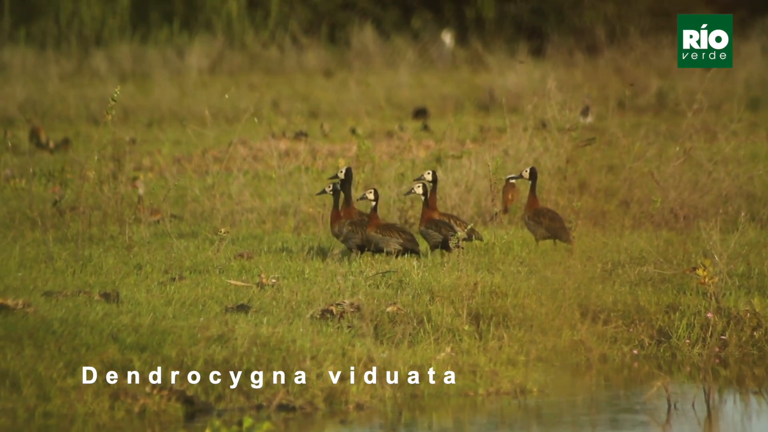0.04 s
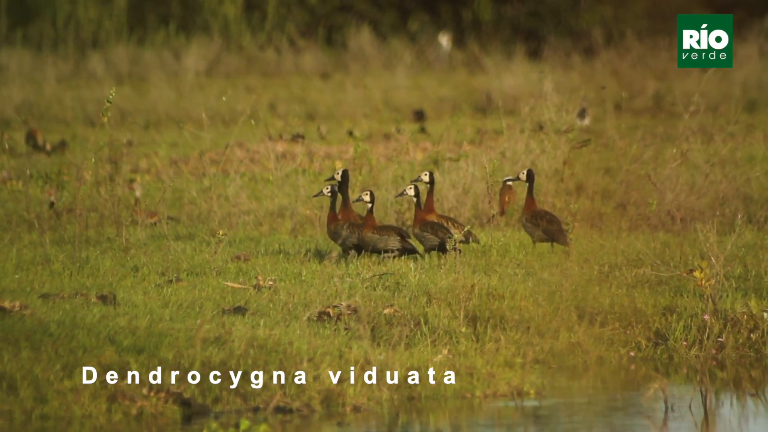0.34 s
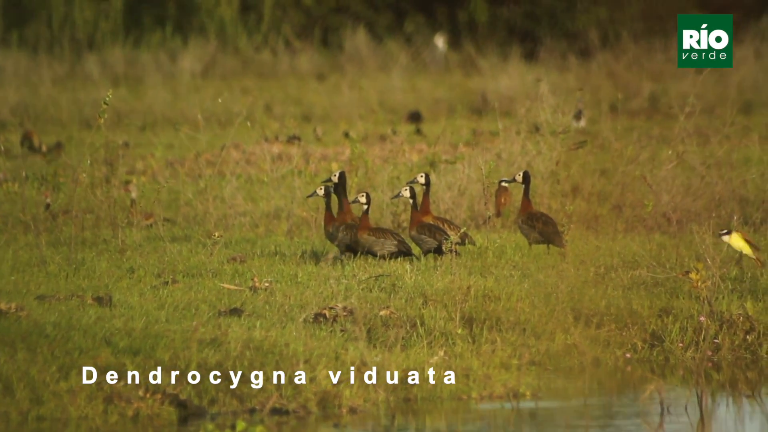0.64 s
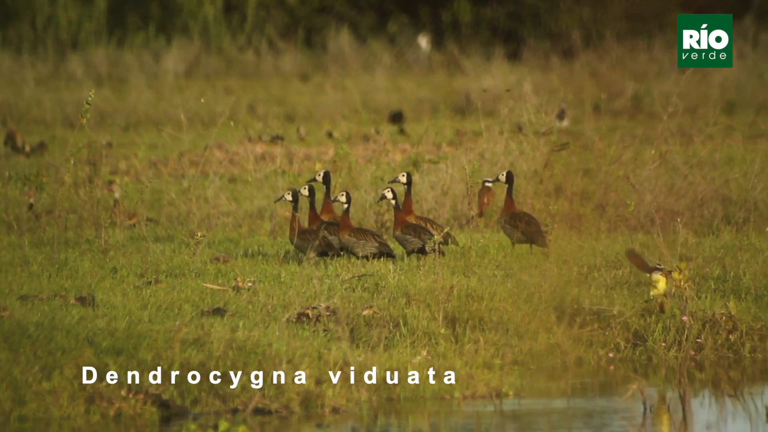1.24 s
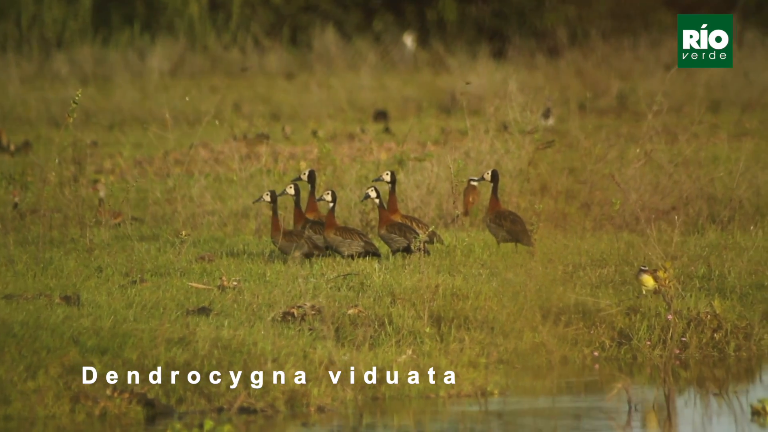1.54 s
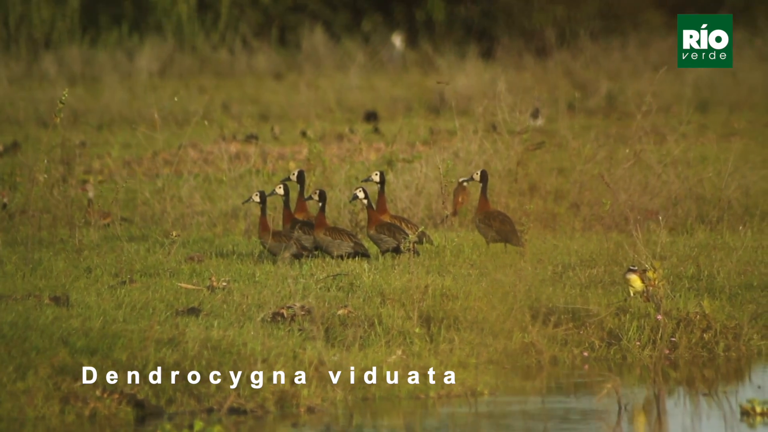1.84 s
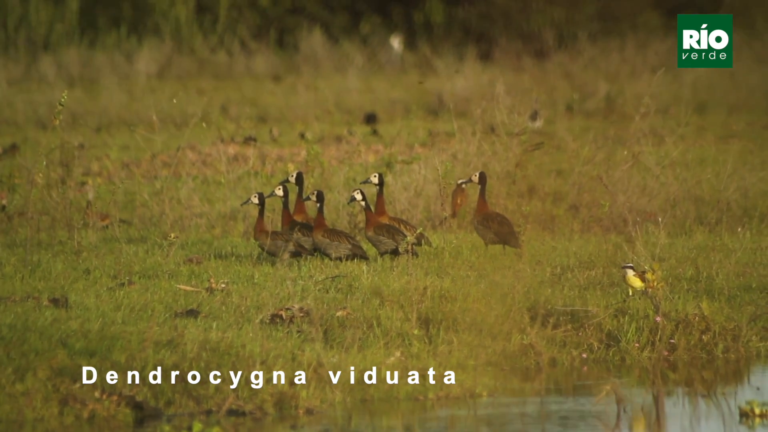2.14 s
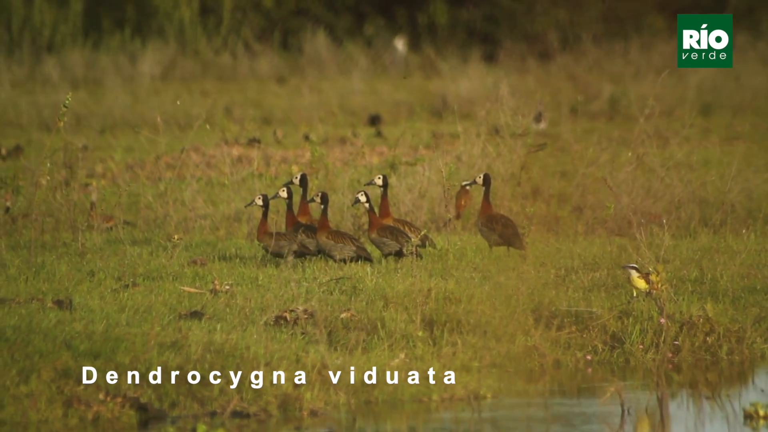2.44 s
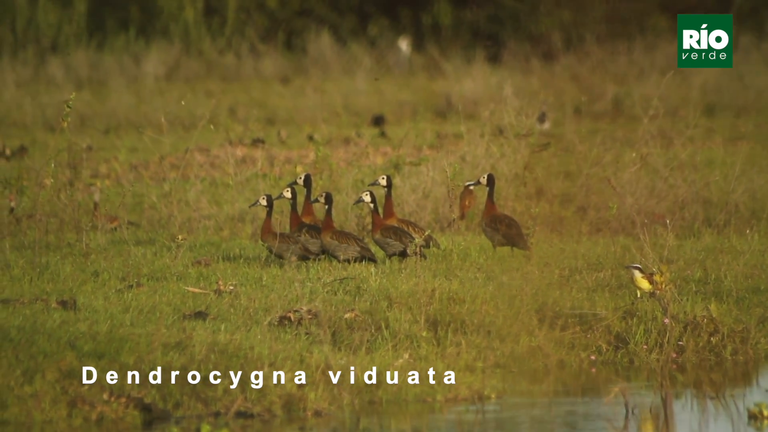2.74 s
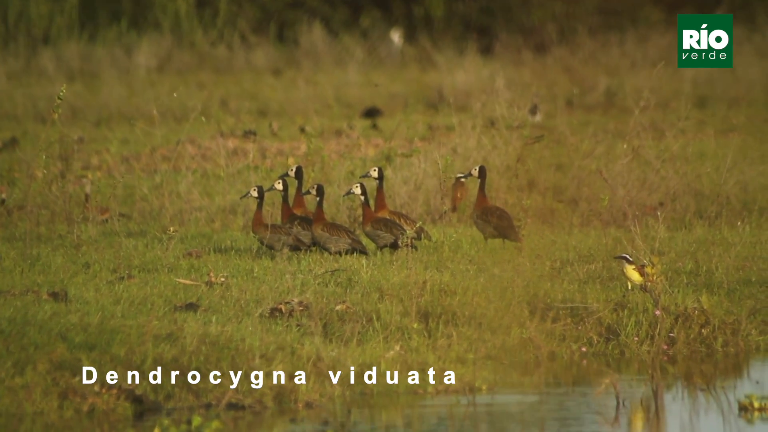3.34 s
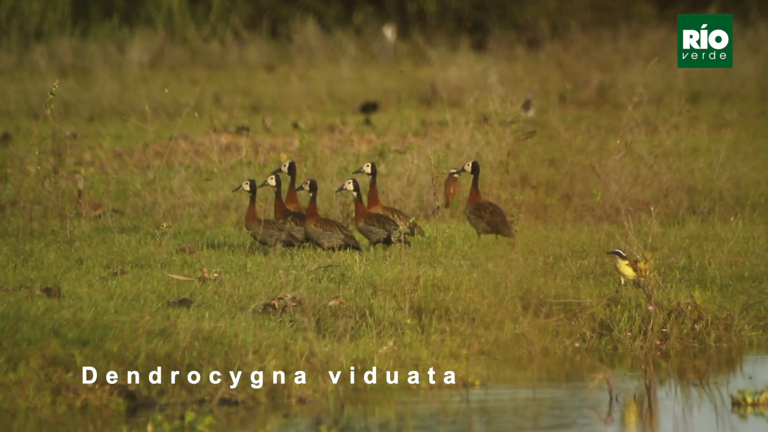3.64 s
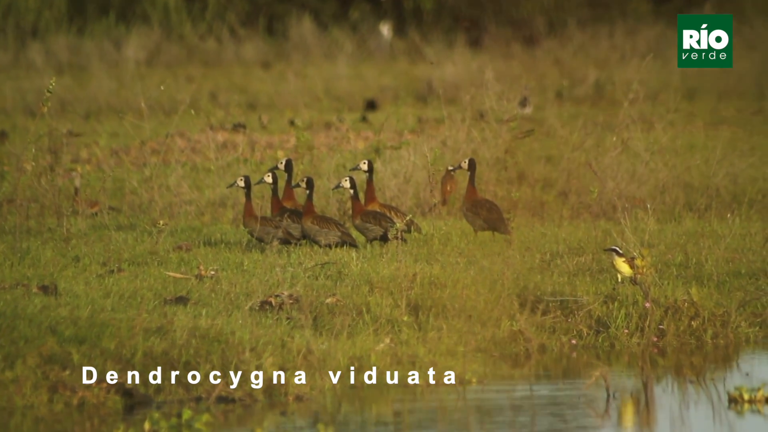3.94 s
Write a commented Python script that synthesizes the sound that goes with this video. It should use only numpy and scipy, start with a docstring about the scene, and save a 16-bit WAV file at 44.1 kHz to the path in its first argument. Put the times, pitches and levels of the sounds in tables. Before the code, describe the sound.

Bush crickets buzz steadily while a duck whistles and other birds cackle and twitter.

```python
"""A brief low thump sounds over bush crickets that buzz steadily, scraping their wings.
In this marsh meadow birds tick, hoot softly and cackle; a whistling duck gives three slurred notes,
harmonics filtered by its throat. Later another bird whistles twice, and chips and twittering follow
over distant chatter. Reeds and trees scatter the bird calls into a short, diffuse echo.
Now and then a puff of wind bumps the microphone."""
import sys
import numpy as np
from scipy import signal
from scipy.fft import rfft, irfft
from scipy.io import wavfile
from scipy.ndimage import uniform_filter1d

SR = 44100
rng = np.random.default_rng(int(sys.argv[2]) if len(sys.argv) > 2 else 0)


def digitize_waveform(pressure):
    """Quantize a signal to 16-bit integers and store it at the path in sys.argv[1].

    Rows of a 2-D input are taken as channels; values are limited to [-1, 1].
    """
    field = np.atleast_2d(pressure).T
    bounded = np.clip(field, -1, 1)
    quanta = np.round(bounded * 32767).astype(np.int16)
    wavfile.write(sys.argv[1], SR, quanta)


N = 176400

def undb(db):
    """Amplitude ratio of a level in decibels."""
    return 10 ** (np.asarray(db) / 20)

def unit(x):
    """Normalisation to rms 1."""
    return x / np.sqrt(np.mean(np.abs(x) ** 2))

def curve(t, rows, col=1):
    """Linear interpolation of one column of a table."""
    rows = np.array(rows)
    return np.interp(t, rows[:, 0], rows[:, col])

def colour(hz, points):
    """Frequency response, interpolated on logarithmic axes."""
    p = np.array(points)
    return undb(np.interp(np.log(hz + 1), np.log(p[:, 0]), p[:, 1]))

def noise(points):
    """White noise filtered to a given spectrum."""
    return unit(irfft(rfft(rng.standard_normal(N)) * colour(np.fft.rfftfreq(N, 1 / SR), points), N))

def wander(hz):
    """Random fluctuation: low-pass noise of bandwidth about hz."""
    lowpass = np.exp(-.5 * (np.fft.rfftfreq(N, 1 / SR) / hz) ** 2)
    return unit(irfft(rfft(rng.standard_normal(N)) * lowpass, N))

def hiss(t, hz, width_hz):
    """Narrow-band noise: a carrier multiplied by a random fluctuation."""
    return unit(wander(width_hz) * np.sin(2 * np.pi * hz * t))

def phase(hz):
    """Phase as the integral of frequency."""
    return 2 * np.pi * np.cumsum(hz) / SR

def add(out, start, x):
    """Superposition of a sound at its start time."""
    i = max(int(start * SR), 0)
    out[i:i + len(x)] += x[:max(len(out) - i, 0)]

def span(length):
    """Normalised time, 0 to 1 over a note."""
    return np.linspace(0, 1, max(int(length * SR), 8))

def during(x, start, u):
    """The stretch of a modulating signal that a note covers."""
    return np.roll(x, -int(start * SR))[:len(u)]

def gate(t, start, end, edge_s=.0051):
    """Trapezoidal envelope."""
    return np.clip(np.minimum(t - start, end - t) / edge_s + .5, 0, 1)

def arch(u):
    """Half-sine envelope."""
    return np.abs(np.sin(np.pi * u))

def thump_and_wind(t, breeze_db=-49):
    """Amplitude-modulated rumble: a brief low thump at the start, then wind pressure on the microphone."""
    # swells of rumble, the opening thump first and wind after it: centre t/s, half width/s, level/dB
    swells = [(.01,0.013,-25.5),(.2,.15,-44.5),(1.22,0.064,-35),(1.48,0.13,-37.5),(1.812,0.042,-36.5),(2.072,0.016,-29.5),(2.24,0.12,-38.5),(2.9,0.14,-38.5),(3.41,0.051,-38.5),(3.968,0.015,-31)]
    # rumble spectrum: f/Hz, gain/dB
    spectrum = [(20,-18.5),(65,3.5),(115,1),(190,-7),(400,-26.5),(800,-45.5)]
    # pressure pulses: t/s, width/s, peak level/dB
    puffs = [(1.771,.002,-22.5),(2.207,0.0022,-20),(3.207,.0014,-22.5),(3.78,.0014,-16.5)]
    rumble = noise(spectrum)
    power = sum(undb(db) ** 2 * np.exp(-((t - when) / width) ** 2) for when, width, db in swells)
    power += undb(breeze_db) ** 2
    out = rumble * np.sqrt(power / uniform_filter1d(rumble ** 2, size=3000))
    for when, width, db in puffs:
        u = (t - when) / width
        out -= undb(db) * (1 - u ** 2) * np.exp(-u ** 2 / 2)
    return out

def stridulate(rate, hz, sweep_hz, rasp, duty=.6, jitter_hz=111.17):
    """Stridulation: each wing stroke scrapes out a raspy, gliding tone."""
    cycle = (phase(rate * (1 + .0066 * wander(2.2))) / (2 * np.pi) + rng.random()) % 1
    u = np.minimum(cycle / duty, 1)
    teeth = 1 + rasp * (wander(480) + 1j * wander(480))
    pitch = hz + sweep_hz * (u - .5) + jitter_hz * wander(122.6)
    return unit(arch(u) * (teeth * np.exp(1j * phase(pitch))).real)

def bush_crickets(level_db=-25):
    """Three near insects stridulate over a chorus whose incoherent sum is noise."""
    # near singers: stroke rate/Hz, f/Hz, sweep per stroke/Hz, relative level/dB
    buzzers = [(50.1,9750,-900,-40.5),(64,10350,901,-40.5),(50.34,10080,-200,-34)]
    # chorus spectrum: f/Hz, gain/dB
    chorus = [(7000,-46.5),(8600,-34.5),(9000,-11.5),(9500,-1),(9850,-5.5),(10060,2),(10270,-16),(10370,-6.5),(10500,0),(10630,-3.5),(10960,-14.5),(11300,-13),(11550,-29.5),(15000,-41.5)]
    near = sum(undb(db) * stridulate(rate, hz, sweep, rasp=1.9) for rate, hz, sweep, db in buzzers)
    return undb(level_db) * unit(near + undb(-31) * noise(chorus))

def still_air(level_db=-51):
    """Stationary broadband noise forms the ambient floor."""
    # ambient spectrum: f/Hz, gain/dB
    spectrum = [(100,-1.5),(450,-2.5),(530,4.5),(620,-2),(2200,-5),(12000,-6.5),(15700,-17)]
    return undb(level_db) * noise(spectrum)

def ticks(length_s=.014, hz=3690, gap_s=.0388):
    """A bird's pulse train of falling chirps, quickening to a steady beat."""
    out, u = np.zeros(N), span(length_s)
    tick = undb(-46) * arch(u) ** 2 * np.sin(phase(hz * (1 + .17 * (1 - 2 * u))))
    for k in range(18):
        middle = .075 + k * gap_s + .038 * (1 - np.exp(-k / 2.6))
        fade_in = 1 - np.exp(-middle / .064)
        add(out, middle - length_s / 2, fade_in * tick)
    return np.sqrt(2) * out

def burst_cricket(t, hz=8360):
    """Gated stridulation of a lower-pitched bush cricket, blurred by noise."""
    # bursts: start t/s, end t/s
    bursts = [(.11,.3),(.43,.61),(.72,.95),(1.06,1.29),(1.37,1.6),(1.71,1.94),(2.2,2.45),(2.57,2.98),(3.06,3.45),(3.52,4.0)]
    song = stridulate(97.5, hz, sweep_hz=-700, rasp=.34) + .5 * hiss(t, hz, width_hz=380)
    return undb(-49.5) * song * sum(gate(t, start, end, edge_s=.018) for start, end in bursts)

def hoots():
    """Frequency glide of a soft, low pure tone that rises quickly and sinks away."""
    # hoots: t/s, length/s, top f/Hz, base level/dB
    notes = [(0.226,0.27,867,-48),(0.784,0.25,881,-46.5),(2.337,0.27,865,-46.5),(2.889,0.26,878,-44)]
    # hoot contour: share of length, frequency ratio, gain/dB
    shape = [(0,0.82,-13.5),(.09,0.95,4),(.2,1,6.5),(.35,0.99,6),(.55,.935,2),(.75,0.8,-14),(1,0.72,-15)]
    out = np.zeros(N)
    for start, length, hz, db in notes:
        u = span(length)
        add(out, start, undb(db + curve(u, shape, 2)) * np.sin(phase(hz * curve(u, shape))))
    return np.sqrt(2) * out

def cackle(u, pitch_hz, sag, jitter, bill_hz, bill_q=1.23):
    """Source and filter: an arched, sagging harmonic tone passes throat and bill resonances."""
    # throat response: f/Hz, gain/dB
    throat = [(700,-10),(1450,2),(2000,-10.5),(2700,-4.5),(3500,-9.5),(4300,-7),(5000,-2.5),(5700,-12),(7000,-40)]
    k = np.arange(1, 12)[:, None]
    hz = pitch_hz * (1 - .17 * (2 * u - 1) ** 2 - sag * (2 * u - 1)) * (1 + .12 * jitter)
    harmonics = np.sin(k * phase(hz) + rng.uniform(0, 2 * np.pi, k.shape))
    bill = 1 / np.hypot(1, bill_q * (k * hz / bill_hz - bill_hz / (k * hz)))
    return arch(u) * unit((bill * colour(k * hz, throat) * harmonics).sum(0))

def near_cackles():
    """Nasal notes, some made harsh by frequency jitter."""
    # cackles: t/s, length/s, top f/Hz, level/dB, roughness 0-1, bill resonance f/Hz
    notes = [(0.328,.068,720,-45,0.04,3500),(1.247,0.053,739,-38.5,0.48,4560),(1.367,0.085,814,-41.5,0,4770),(1.536,0.052,876,-42,0.13,4500),(2.164,0.045,695,-44,0.17,4730),(2.285,0.071,1020,-47,0.18,3500),(2.616,0.02,865,-41,.12,3700)]
    out, jitter = np.zeros(N), wander(480)
    for start, length, hz, db, rough, bill_hz in notes:
        u = span(length)
        note = cackle(u, hz, sag=.0417, jitter=rough * during(jitter, start, u), bill_hz=bill_hz)
        add(out, start, undb(db) * note)
    return out

def slurs():
    """Short bird notes whose frequency follows a parabola through three pitches."""
    # notes: t/s, length/s, start f/Hz, middle f/Hz, end f/Hz, level/dB
    notes = [(.624,0.046,710,873,750,-39.5),(2.731,0.047,714,876,720,-38),(1.973,0.087,4300,5080,6100,-40.5),(2.2,.072,2100,2760,2770,-43)]
    out, shake = np.zeros(N), 1 + .028 * wander(400)
    for start, length, *pitches, db in notes:
        u = span(length)
        hz = np.polyval(np.polyfit([0, .5, 1], pitches, 2), u) * during(shake, start, u)
        add(out, start, undb(db) * arch(u) * np.sin(phase(hz)))
    return np.sqrt(2) * out

def duck(t, slur_s=.0059, tilt_db=-2):
    """Source and filter: four harmonics of a whistle glide through the throat resonance."""
    # three-note call: t/s, f/Hz, source level/dB
    call = [(.76,2270,-58),(.8,2410,-39.5),(.825,2710,-31.5),(.86,3300,-33.5),(.89,3530,-31.5),(.908,3980,-32.5),(.937,4080,-33),(.961,2620,-34.5),(.987,1950,-45.5),(1.01,2750,-31.5),(1.03,3385,-31.5),(1.056,3300,-32.5),(1.073,3557,-31),(1.1,3684,-39),(1.122,2455,-47),(1.14,2130,-37.5),(1.175,2853,-32),(1.21,2933,-35),(1.285,2610,-34),(1.365,2434,-35.5),(1.425,2165,-42)]
    # throat response: f/Hz, gain/dB
    throat = [(2000,-37),(2500,-12.5),(3000,-3),(3600,-1),(4200,1),(5200,0.5),(5900,-22.5),(8800,-10.5),(13000,-38)]
    smoothing = signal.windows.hann(int(2 * slur_s * SR)) / (slur_s * SR)
    hz = np.convolve(curve(t, call), smoothing, "same") * (1 + .0028 * wander(135))
    voice = sum(undb(tilt_db * (k - 1)) * colour(k * hz, throat) * np.sin(k * phase(hz))
                for k in range(1, 5))
    return np.sqrt(2) * voice * undb(curve(t, call, 2)) * gate(t, call[0][0], call[-1][0])

def insect_trills(t, rate_hz=50):
    """Amplitude modulation breaks a wavering tone into two faint trills."""
    # trills: start t/s, end t/s, f/Hz, level/dB
    trills = [(1.424,1.713,6130,-55),(2.55,2.996,6210,-58)]
    out = np.zeros(N)
    for start, end, hz, db in trills:
        beat = .4 + arch(phase(rate_hz * (1 + .072 * wander(8))) / (2 * np.pi)) ** 2
        tone = np.sin(phase(hz * (1 + .012 * wander(194))))
        out += undb(db + 2 * wander(30)) * gate(t, start, end, edge_s=.035) * unit(beat * tone)
    return out

def chatter(length_s=.085, pitch_hz=932):
    """Superposition of distant cackles, scattered in onset, pitch and length."""
    # bouts: start t/s, end t/s, note rate/Hz, level/dB
    bouts = [(1.751,3.3,8,-52),(3.297,4.0,24,-52.5)]
    out, jitter = np.zeros(N), .12 * wander(500)
    for start, end, rate, db in bouts:
        for when in np.arange(start, end, 1 / rate):
            late, detune, stretch = rng.uniform(-1, 1, 3)
            u = span(length_s * (1 + stretch / 3))
            hz = pitch_hz * (1 + .13 * detune)
            note = cackle(u, hz, sag=.0902, jitter=during(jitter, when, u), bill_hz=3100)
            add(out, when + late / rate / 2, undb(db) * note)
    return out

def insect_hiss(t):
    """Two narrow noise bands: one swells, a thinner one joins in and holds steady."""
    # swell: t/s, level/dB
    swell = [(0,-73),(2,-68),(2.3,-57),(3.1,-50),(3.6,-49),(4,-49)]
    thin = undb(-59) * hiss(t, 7670, width_hz=110) * gate(t, 2.13, np.inf, edge_s=.044)
    return undb(curve(t, swell)) * hiss(t, 8280, width_hz=300) + thin

def rasps(t):
    """Band noise under Gaussian envelopes gives two hoarse bird calls."""
    # rasps: centre t/s, half width/s, level/dB
    calls = [(2.944,0.025,-41.5),(3.015,0.034,-48.5)]
    envelope = sum(undb(db) * np.exp(-((t - when) / width) ** 2) for when, width, db in calls)
    return envelope * hiss(t, 4420, width_hz=480)

def answer(t):
    """Another bird whistles twice, each note a single gliding sinusoid."""
    # one contour a note: t/s, f/Hz, level/dB
    notes = [
        [(3.058,3740,-45),(3.072,4660,-33.5),(3.101,4743,-28.5),(3.112,5700,-42)],
        [(3.172,3770,-43),(3.188,4610,-30),(3.22,4710,-30),(3.27,4606,-34.5),(3.315,4530,-40),(3.34,4190,-44)],
    ]
    out = np.zeros(N)
    for note in notes:
        hz = curve(t, note) * (1 + .0028 * wander(150))
        out += undb(curve(t, note, 2)) * np.sin(phase(hz)) * gate(t, note[0][0], note[-1][0])
    return np.sqrt(2) * out

def chips(length_s=.0088, centre_hz=5280):
    """Steep downward chirps, roughened by random frequency modulation."""
    # chips: t/s, level/dB
    notes = [(3.148,-32),(3.222,-33),(3.304,-33)]
    out, u, rasp = np.zeros(N), span(length_s), .114 * wander(1100)
    for start, db in notes:
        hz = centre_hz * (1 + .295 * (1 - 2 * u) + during(rasp, start, u))
        add(out, start, undb(db) * arch(u) * np.sin(phase(hz)))
    return np.sqrt(2) * out

def twitter(crest_hz=6970):
    """Frequency modulation: each syllable dips, climbs to a thin crest and drops steeply."""
    # syllables: t/s, length/s, dip f/Hz, base level of dip/dB, base level of fall/dB
    syllables = [(3.37,0.041,6900,-40,-37),(3.469,0.05,6570,-36,-42),(3.576,0.044,5160,-31.5,-39),(3.689,0.06,4520,-33.5,-37),(3.795,.04,4290,-33.5,-36.5),(3.899,0.072,4110,-33,-44.5)]
    # syllable contour: share of length, dip depth 0-1, ratio to crest frequency, gain/dB
    shape = [(0,0.01,1,-14),(.2,.95,1,-1.5),(.4,1,0.85,-4.5),(.56,0.01,0.96,-11),(.72,0,.96,-9),(.87,0,0.67,5.5),(1,0.08,0.505,-12.5)]
    out, shake = np.zeros(N), 1 + .024 * wander(620)
    for start, length, dip_hz, dip_db, fall_db in syllables:
        u = span(length)
        depth = curve(u, shape)
        hz = (depth * dip_hz + (1 - depth) * crest_hz * curve(u, shape, 2)) * during(shake, start, u)
        db = curve(u, shape, 3) + np.interp(u, [.4, .7], [dip_db, fall_db])
        add(out, start, undb(db) * np.minimum(20 * arch(u), 1) * np.sin(phase(hz)))
    return np.sqrt(2) * out

def meadow(x, echo_db, t60_s=.33):
    """Scattering from reeds and trees adds a diffuse, exponentially decaying echo."""
    t = np.arange(SR) / SR
    tail = rng.standard_normal(SR) * undb(-60 * t / t60_s) * (1 - np.exp(-t / .004))
    return x + undb(echo_db) * signal.fftconvolve(x, tail / np.linalg.norm(tail))[:N]

def scene():
    """Superposition of insects, rumble, air and birds; far birds carry a larger share of echo."""
    t = np.arange(N) / SR
    insects = bush_crickets() + burst_cricket(t) + insect_trills(t) + insect_hiss(t)
    flutter = undb(.81 * wander(88))
    whistles = (duck(t) + answer(t)) * flutter
    near = ticks() + hoots() + near_cackles() + slurs() + whistles + rasps(t) + chips()
    birds = meadow(near, echo_db=-17) + meadow(chatter() + twitter(), echo_db=-5.5)
    return (insects + thump_and_wind(t) + still_air() + birds)[None]

def record(dry, cutoff_hz=15700):
    """Band limiting: a steep low-pass filter removes the highest treble."""
    return signal.sosfilt(signal.ellip(10, .1, 80, cutoff_hz, fs=SR, output="sos"), dry)

dry = scene()
out = record(dry)
digitize_waveform(out)
```